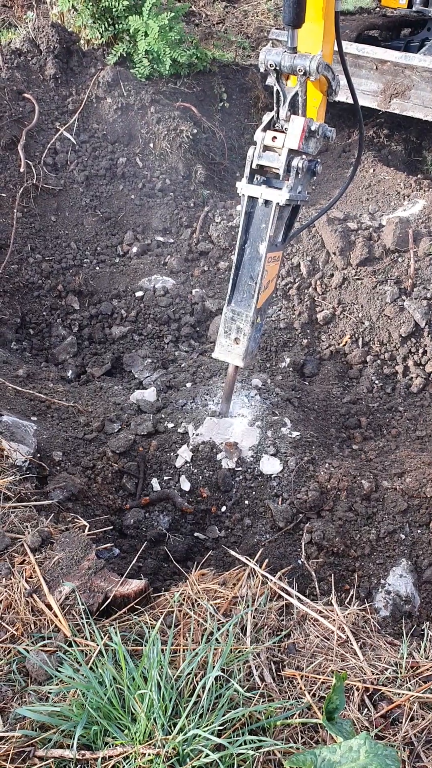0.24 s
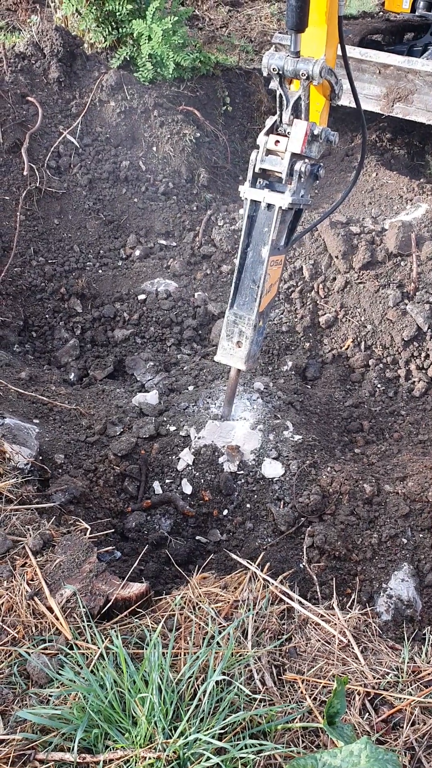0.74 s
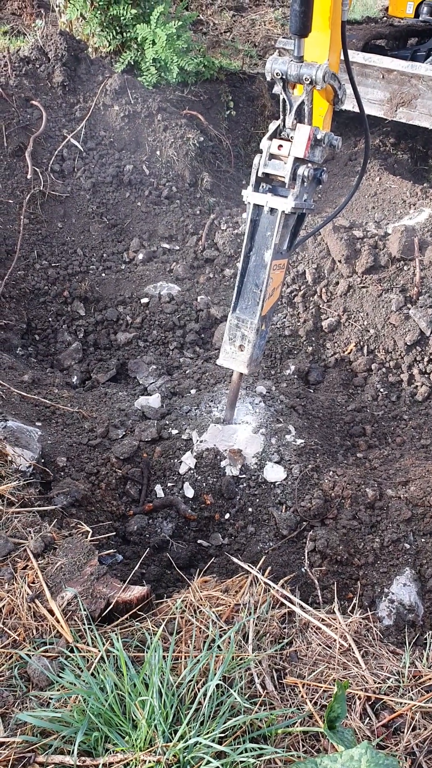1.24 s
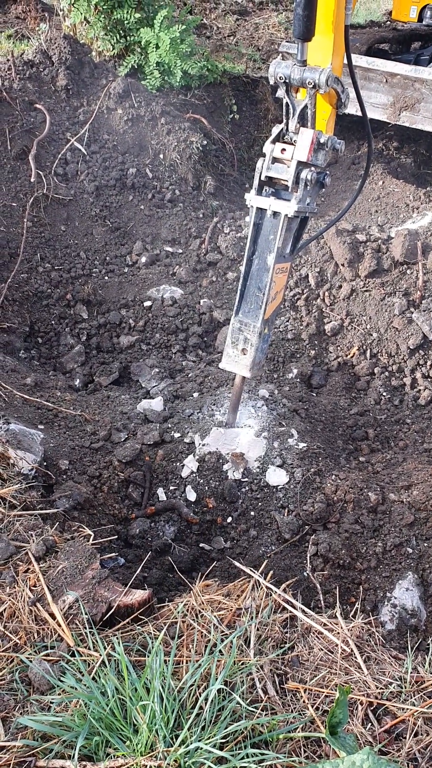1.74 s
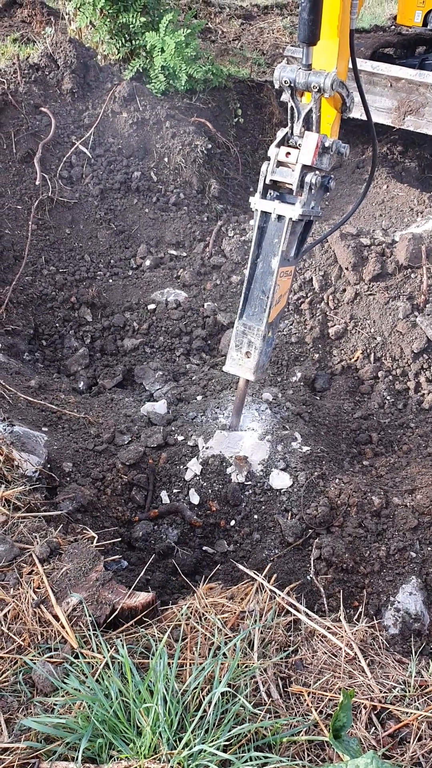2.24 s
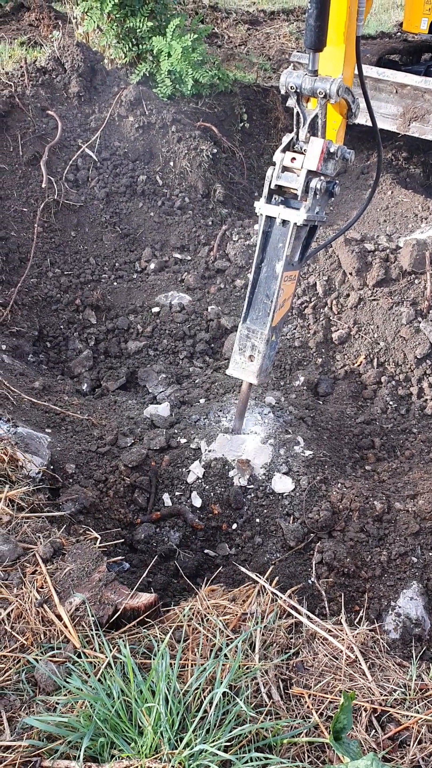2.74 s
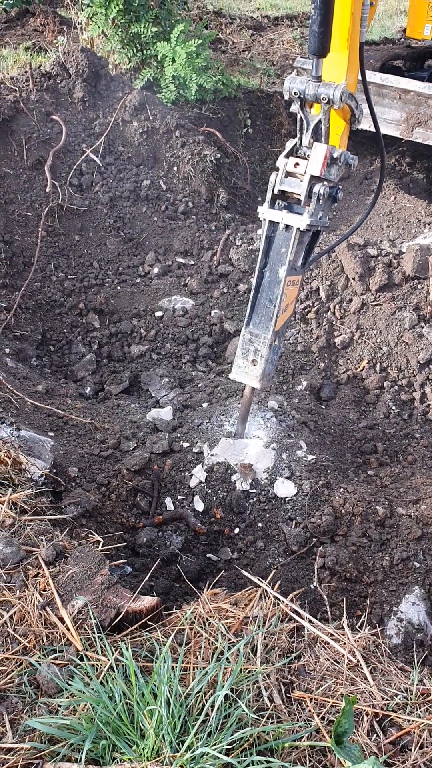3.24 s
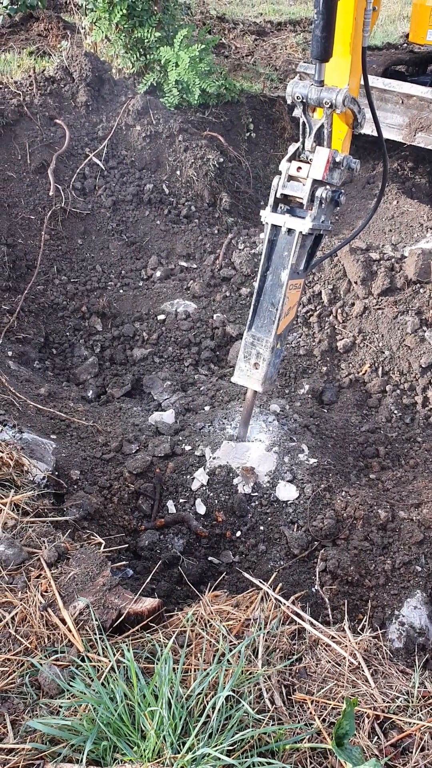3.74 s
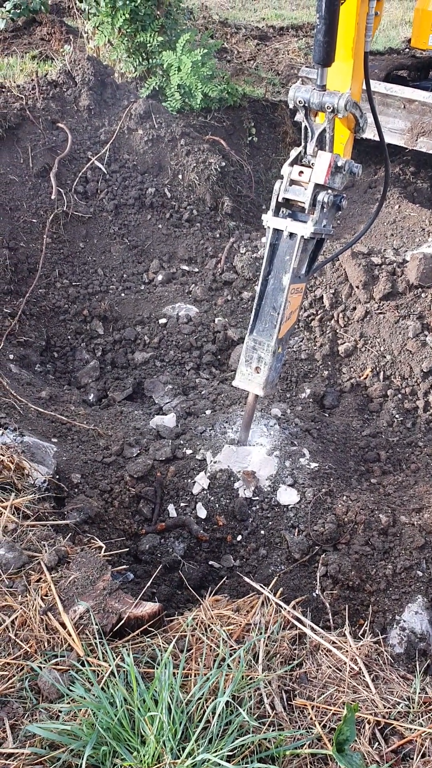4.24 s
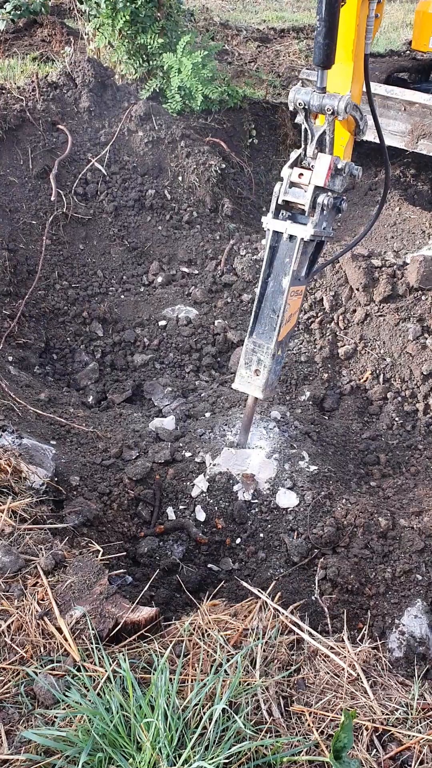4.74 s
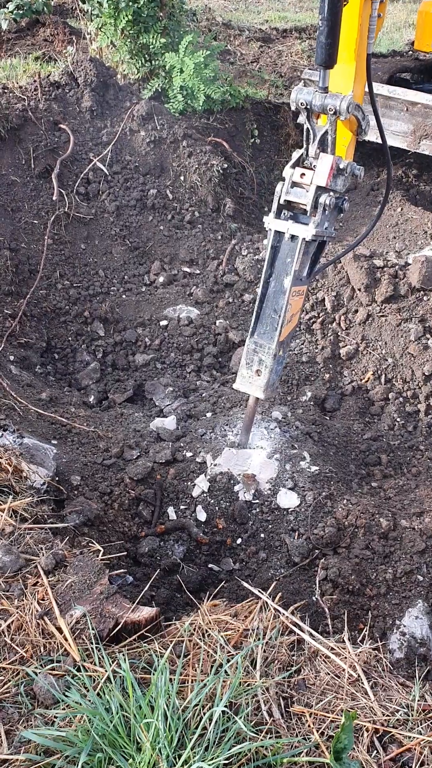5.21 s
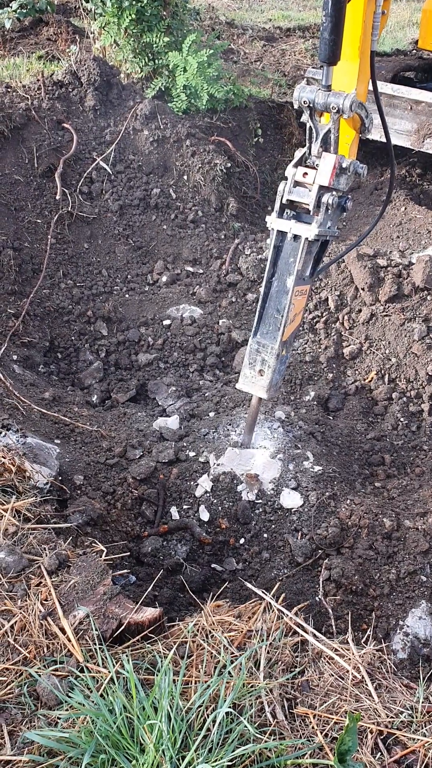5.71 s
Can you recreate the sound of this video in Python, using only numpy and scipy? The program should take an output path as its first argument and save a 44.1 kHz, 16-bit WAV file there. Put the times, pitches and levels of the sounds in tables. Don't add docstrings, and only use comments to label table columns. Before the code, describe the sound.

A hydraulic breaker hammers rock in fast metallic blows, stops while the digger's diesel idles on, then restarts with a hard clang.

```python
import sys
import numpy as np
from scipy import signal
from scipy.fft import rfft, irfft, next_fast_len
from scipy.io import wavfile
from scipy.ndimage import uniform_filter1d

SR = 44100
rng = np.random.default_rng(int(sys.argv[2]) if len(sys.argv) > 2 else 0)


def ratio_of_db(decibels):
    return 10 ** (np.asarray(decibels, float) / 20)


def int16_out(signal):
    q = np.round(np.clip(np.atleast_2d(signal).T, -1, 1) * 32767)
    wavfile.write(sys.argv[1], SR, q.astype(np.int16))


N = 263277

MOVE_S = 3
USUAL_BLOW_DB = -6
HAMMER_LEAD_S = 0.000328
# t/s, peak level/dB
FIRST_BLOWS = [(0.0483, -8.5), (0.1256, -8.5), (0.2024, -5.5), (0.2773, -6.5), (0.3556, -7.5),
               (0.4339, -5.5), (0.5097, -7), (0.5891, -6), (0.6629, -7), (0.7517, -7), (0.8235, -5),
               (0.8929, -7.5), (0.9597, -8), (1.0266, -7), (1.0944, -6.5), (1.1618, -7), (1.2306, -6),
               (1.2984, -6.5), (1.3668, -6.5), (1.4356, -7.5), (1.503, -6), (1.5703, -6.5), (1.6372, -6),
               (1.7045, -5), (1.7719, -6)]
# t/s, peak level/dB
SECOND_BLOWS = [
    (5.5413, -2),
    (5.6151, -6),
    (5.675, -6.5),
    (5.7309, -5),
    (5.7843, -5.5),
    (5.8376, -6),
    (5.8915, -5.5),
    (5.9454, -4.5),
]
# f/Hz, time to fall 60 dB/s
RATTLE_T60 = [(500, 0.57), (2000, 0.23), (6000, 0.11), (15000, 0.12)]
# f/Hz, left minus right/dB, shared part/0-1
HAMMER_PORTS = [(125, 1, 1), (285, -8, 0.31), (640, 0.5, 1), (1450, 5, 0.56), (3170, -3, 0.11),
                (6130, 3, 0.16), (8800, 7, 0.36), (15500, 6.5, 0.18)]


def breaker():
    s, peak_db, housing_db, bright_db, valve_db = strokes()
    valve_s = s - np.where(s < MOVE_S, 0.0093, 0.0085)
    s = s + 0.0007
    restart = np.arange(len(s)) == np.argmax(s > MOVE_S)
    valve_db = valve_db + 1.5 * restart
    peak_db = peak_db - 3.6 * restart
    restart_db = 5 * restart

    blows = chisel_and_housing(s, peak_db, housing_db)
    low = arm_and_ground(s, peak_db, restart_db)
    spool = valve_spool(valve_s, valve_db)
    rattle = rattle_and_jet(s, peak_db, bright_db, restart_db, valve_s, valve_db)
    direct = low + spool + rattle[0]
    other = np.roll(spool, 60) + rattle[1]
    return blows + ports(direct, other, HAMMER_PORTS, HAMMER_LEAD_S)


def strokes():
    earlier = [(early_s, -5) for early_s in (-0.13, -0.029)]
    s, peak_db = np.transpose(earlier + FIRST_BLOWS + SECOND_BLOWS)
    seat_no = (s > MOVE_S).astype(int)
    since = s - np.where(seat_no, SECOND_BLOWS[0][0], FIRST_BLOWS[0][0])
    harder = peak_db - USUAL_BLOW_DB
    luck = rng.standard_normal((len(s), 3))

    housing_db = np.take([-16.5, -15.5], seat_no) - 0.41 * harder + 0.8 * luck[:, 0]
    housing_db += -1.5 * (s == SECOND_BLOWS[0][0])
    bright_db = np.take([2.0, 1], seat_no) - 0.93 * harder + 1.0 * luck[:, 1]
    fade_db_per_s = np.take([1, 63.5], seat_no)
    valve_db = np.take([-21, -16], seat_no) - fade_db_per_s * since + 1.2 * luck[:, 2]
    return s, peak_db, housing_db, bright_db, valve_db


def chisel_and_housing(s, peak_db, housing_db):
    # f/Hz, left minus right/dB, left port leads/rad
    first_places = [(772, -3, 1.3), (860, 8, 1.8), (1095, 3, .5), (1154, -1, 1.2), (1528, 4, -.9),
                    (1959, 12, -2.1), (2029, -1, .8), (2352, 0, -.4), (2420, 0, -.4), (2592, -1, -.3),
                    (3106, 1, -1), (3211, -9, 1.6), (3356, 0, 1.8), (3507, 9, 2.2), (3816, -4, 2),
                    (4449, -9, -3.1), (5162, -1, 3)]
    # level/dB, time to fall 60 dB/s
    first_rings = [(-22.5, 0.38), (-6.5, 0.11), (-5, 0.087), (-16.5, 0.21), (-17.5, 0.072), (-36, 0.081),
                   (-15, 0.15), (-8.5, 0.14), (-24.5, 0.2), (-10.5, 0.097), (-26, 0.33), (-12, 0.044),
                   (-16.5, 0.069), (-57.5, 0.061), (-13.5, 0.012), (-10.5, 0.037), (-14.5, 0.071)]
    # f/Hz, left minus right/dB, left port leads/rad
    second_places = [(632, 1, .5), (772, -1, 1.5), (837, 2, 1.7), (1073, 4, .7), (1466, 5, .6),
                     (1765, 11, 1), (1868, 8, -.1), (2013, 2, .3), (2390, 1, -.5), (2667, -3, .8),
                     (3009, 4, .9), (3540, 7, 1.4), (3749, -3, 2), (4150, -1, 1.7), (6939, 2, -2.2)]
    # level/dB, time to fall 60 dB/s
    second_rings = [(-21.5, 0.2), (-14.5, 0.14), (-13, 0.2), (-2, 0.06), (-26, 0.056), (-21, 0.067),
                    (-14, 0.056), (-8, 0.04), (-9.5, 0.13), (-12.5, 0.084), (-3, 0.035), (-3, 0.02),
                    (-12.5, 0.085), (-24, 0.038), (-15, 0.063)]
    a, b = s < MOVE_S, s > MOVE_S
    first = seat(s[a], peak_db[a] - 5.5, housing_db[a], first_places, first_rings, crowd_db=5.5)
    second = seat(s[b], peak_db[b] - 7.0, housing_db[b], second_places, second_rings, crowd_db=5)
    return first + second


def seat(s, db, housing_db, places, rings, crowd_db):
    # f/Hz, level per Hz/dB
    dense = [(300, -28.5), (600, -13), (1300, -10.5), (2400, -7.5), (4200, -3), (4900, -15), (7700, -39.5),
             (8900, -14), (11000, -29.5), (16000, -20)]
    t = np.arange(SR // 2) / SR
    bodies = np.zeros((4, 2, t.size))
    contact = (1 - np.exp(-t / 0.00015)) * (1 + 1.1 * ratio_of_db(-60 * t / 0.02))
    for k, ((hz, pan_db, lead), (level_db, t60)) in enumerate(zip(places, rings)):
        phase = 2 * np.pi * hz * t + np.array([[lead], [-lead]]) / 2
        pan = ratio_of_db([[pan_db / 2], [-pan_db / 2]])
        mode = ratio_of_db(level_db - 60 * t / t60) * pan * np.sin(phase)
        if hz < 1400:
            bodies[0] += mode * (1 - np.exp(-t / 0.0021))
        else:
            bodies[1 + k % 3] += mode * contact

    crack = ratio_of_db(0.5 - 60 * t / 0.014) * np.sin(2 * np.pi * 2450 * t)
    bodies[1] += crack * (1 - np.exp(-t / 0.0002))

    def crowd_fade(hz):
        return ratio_of_db(-60 * t / at_hz(RATTLE_T60, hz)) + 2.6 * ratio_of_db(-60 * t / 0.011)

    crowd = bands(dense, crowd_fade, size=t.size)
    bodies[2] += ratio_of_db(crowd_db) * ports(*crowd, HAMMER_PORTS, HAMMER_LEAD_S)

    luck = 1.6 * rng.standard_normal((len(s), 4))
    levels_db = db + luck.T * [[0], [0.5], [1], [1]]
    levels_db[0] += housing_db + 17.0
    early = SR // 8
    out = np.zeros((2, N))
    for level_db, body in zip(levels_db, bodies):
        hits = clicks(s, ratio_of_db(level_db), size=early)
        out += signal.fftconvolve(hits[None], body)[:, early:early + N]
    return out


def arm_and_ground(s, peak_db, restart_db):
    # f/Hz, level/dB, time to fall 60 dB/s
    arm_modes = [(863, -27, .4), (975, -40, .7), (1357, -37, 1.2), (1464, -39, .5), (1938, -38, 1.7),
                 (2365, -23, .3), (2590, -31, .3), (3090, -34, .45), (4200, -38, .3), (4650, -34, .35)]
    # f/Hz, level/dB, time to fall 60 dB/s
    ground_modes = [(81, -33.5, 0.2), (183, -31.5, 0.11), (213, -21.5, 0.073), (254.6, -23, 0.13)]
    arm = struck(s, peak_db + restart_db, arm_modes, spread_db=2.0)
    thump_db = peak_db + 0.93 * (peak_db - USUAL_BLOW_DB)
    return arm + struck(s + 0.00884, thump_db, ground_modes, spread_db=3.0)


def valve_spool(valve_s, valve_db):
    # f/Hz, level/dB, time to fall 60 dB/s
    first_valve = [(4120, 2.5, 0.048), (4306, -2, 0.023), (7103, -8.5, 0.14), (3280, -15.5, 0.0067)]
    # f/Hz, level/dB, time to fall 60 dB/s
    second_valve = [(5020, -6, .07), (4250, -7, .02), (7300, -14, .08), (3100, -9, .015)]
    a = valve_s < MOVE_S
    spool = struck(valve_s[a], valve_db[a] - 7.0, first_valve, spread_db=2.0)
    spool += struck(valve_s[~a], valve_db[~a] - 7.0, second_valve, spread_db=2.0)
    spool += 1.2 * np.roll(spool, 97) + 1.8 * np.roll(spool, 190)
    return spool


def rattle_and_jet(s, peak_db, bright_db, restart_db, valve_s, valve_db):
    # f/Hz, level per Hz/dB
    rattle_spectrum = [(300, -41), (700, -20), (2000, -15.5), (4200, -18), (6000, -18), (7500, -24.5),
                       (9000, -26), (16000, -33)]
    grit = ratio_of_db(2.5 * drift(120))

    def dying(hz):
        bright = np.clip(np.log2(hz / 3000), 0, 1)
        t60 = at_hz(RATTLE_T60, hz)
        hit_db = peak_db + restart_db * (2 - bright) + bright * bright_db
        hit = clicks(s, ratio_of_db(hit_db + spent(s, t60)))
        tail = fade(hit, t60)
        jet_t60 = 0.065
        jet_db = valve_db + 9.0 + 7.5 * bright
        jet = fade(clicks(valve_s, ratio_of_db(jet_db + spent(valve_s, jet_t60))), jet_t60)
        far = 0.13 * ratio_of_db(-9.0 * bright) * fade(hit, 0.7)
        return (tail + jet) * grit + far

    return ratio_of_db(1.0) * bands(rattle_spectrum, dying)


def squeaks():
    # t/s, length/s, f/Hz, width/Hz,
    # level/dB
    narrow_noises = [(2.116, 0.18, 7900, 200, -72.5), (2.24, 0.18, 9200, 200, -77.5),
                     (2.334, 0.16, 7240, 500, -69), (2.4, 0.062, 850, 500, -49.5), (2.41, .02, 2400, 600, -60),
                     (4.29, .07, 6300, 1500, -59), (5.34, 0.095, 1743, 40, -47.5),
                     (5.35, 0.039, 3960, 80.3, -53), (5.472, 0.1, 8770, 150, -59), (2.702, 4.3, 1074, 50, -56.5),
                     (2.8, 2.5, 1695, 60.3, -59), (1.81, 0.29, 1010, 150, -53)]
    out, t = np.zeros((2, N)), np.arange(N) / SR
    white = rng.standard_normal(N)
    for s, length, hz, width_hz, db in narrow_noises:
        t60 = 3.0 / width_hz
        narrow = ring(ring(white, hz, t60), hz, t60)
        swell = np.sin(np.pi * np.clip((t - s) / length, 0, 1))
        out += ratio_of_db(db) * rms_one(narrow) * swell * [[1.3], [0.7]]
    return out


def engine():
    # t/s, firing rate/Hz
    speed_points = [(0, 52), (.62, 50.8), (.9, 45), (1.2, 45), (1.7, 48), (2.15, 56.2), (2.35, 55.5),
                    (2.65, 52.2), (3.6, 50.3), (5.5, 50.05), (5.68, 47.4), (5.97, 47)]
    # t/s, load/0-1
    load_points = [
        (0, 0.46),
        (.7, 0.23),
        (.85, 0.97),
        (1.4, 0.75),
        (1.8, 0.86),
        (2.25, 0.01),
        (5.5, 0),
        (5.58, .55),
        (5.8, 0.96),
    ]
    # multiple of the three-firing cycle, level/dB
    exhaust = [(1, -54.5), (2, -33.5), (3, 0), (4, -26), (5, -31.5), (6, -30.5), (7, -40.5), (8, -34.5),
               (9, -23.5), (10, -22), (11, -24.5), (12, -19), (13, -21.5), (14, -29.5), (15, -21.5),
               (16, -32), (17, -28.5), (18, -21), (19, -39.5), (20, -41), (21, -29.5), (22, -47.5),
               (23, -26.5), (24, -22), (25, -36.5),
               (32, -23), (34, -29.5), (35, -24.5), (39, -25.5), (66, -30.5), (102, -37.5)]
    # f/Hz, level per Hz/dB
    clatter = [(30, 1), (90, -5), (200, -14.5), (380, -9), (470, -29), (600, -9), (770, -14), (900, -18),
               (2140, -24.5), (3980, -30), (5100, -48), (6000, -38.5), (7000, -33.5), (9000, -37)]
    # f/Hz, left minus right/dB, shared part/0-1
    engine_ports = [(128, 6, 0.48), (297, -5.5, 1), (644, -1, 0.3), (1430, 1.5, 0.59), (3300, -3, 0.07),
                    (7000, 8.5, 0.19), (15000, 14, 0.33)]
    t = np.arange(N) / SR
    speed = np.interp(t, *np.transpose(speed_points))
    speed = uniform_filter1d(speed, SR // 8, mode="nearest")
    load = np.interp(t, *np.transpose(load_points))
    cycle = 2 * np.pi * np.cumsum(speed) / SR / 3

    level_db = -44.5 + 4 * load + gain_lift(t)
    boom_db = level_db + 15.5 - 17.5 * load
    second_db = level_db - 8 - 2 * (speed - 50)
    bark_db = 16 * np.sin(np.pi * np.clip((t - FIRST_BLOWS[-1][0] - 0.03) / 0.32, 0, 1))
    second_db = second_db + bark_db
    boom = ratio_of_db(boom_db + 0.28 * drift(4.4)) * np.sin(3 * cycle)
    boom += ratio_of_db(second_db + 2.1 * drift(12)) * np.sin(6 * cycle + 1)

    tones = np.zeros(N)
    for k, db in exhaust:
        if k in (3, 6):
            continue
        waver_db = (0.6 if k % 3 == 0 else 2.2) * drift(2.5)
        tone_db = db + 18.0 + 0.62 * bark_db * (k == 9) + waver_db
        tones += ratio_of_db(tone_db) * np.sin(k * cycle + rng.uniform(0, 6.33) + 0.18 * drift(2.4))
    tones += ratio_of_db(-20.0 + 2.83 * (speed - 48.5) + 1.5 * drift(6.6)) * np.sin(36 * cycle)
    tones = signal.lfilter(*signal.iirnotch(475, 3.5, fs=SR), tones)

    throb = 1 + 0.086 * np.cos(3 * cycle) + 0.041 * np.cos(cycle)
    noise = bands(clatter, lambda hz: ratio_of_db(0.76 * drift(4.2)) * (throb if hz > 500 else 1))
    noise = signal.sosfilt(signal.cheby2(6, 30, 7700, fs=SR, output="sos"), noise)
    hiss = ratio_of_db(-54.0) * signal.lfilter([1, 0.25], [1], rng.standard_normal((2, N)))
    near, far = ratio_of_db(level_db + 23.5) * (noise + hiss)
    direct = np.sqrt(2) * boom + ratio_of_db(level_db) * tones + near
    return duck() * ports(direct, far, engine_ports, lead_s=0.00045)


def gain_lift(t):
    start, end = FIRST_BLOWS[-1][0] + 1.05, SECOND_BLOWS[0][0]
    rise = np.sin(np.pi / 2 * np.clip((t - start) / 0.65, 0, 1))
    return 10 * rise * np.clip(1 - (t - end) / 0.1, 0, 1)


def duck():
    s = np.transpose(FIRST_BLOWS + SECOND_BLOWS)[0] - 0.0045
    dip = fade(clicks(s, 0.9), 0.14)
    return ratio_of_db(-9.5 * uniform_filter1d(dip, SR // 150))


def ports(direct, other, table, lead_s):
    size = next_fast_len(direct.size + 512)
    hz = np.arange(size // 2 + 1) * SR / size
    apart = hz ** 4 / (hz ** 4 + 215 ** 4)
    tilt = ratio_of_db(apart * at_hz(table, hz + 1) / 2)
    shared = 1 - apart * (1 - np.clip(at_hz(table, hz + 1, order=2), 0, 1))
    lag = 2 * np.pi * hz * lead_s * apart
    near, far = rfft(direct, size), rfft(other, size)
    right = shared * near * np.exp(-1j * lag) + np.sqrt(1 - shared ** 2) * far
    return irfft(np.array([near * tilt, right / tilt]), size)[:, :direct.size]


def bands(spectrum, shape, size=N):
    out, edges = 0, 32 * 2 ** np.arange(0, 9.2, 1 / 3)
    white = rng.standard_normal((2, 2, size))
    for k, (low, high) in enumerate(zip(edges, edges[1:])):
        hz = np.sqrt(low * high)
        if hz > spectrum[0][0]:
            sos = signal.butter(2, [low, high], "band", fs=SR, output="sos")
            band = signal.sosfilt(sos, white[k % 2])
            out = out + ratio_of_db(at_hz(spectrum, hz)) * shape(hz) * band
    return out


def struck(s, db, modes, spread_db):
    luck = rng.standard_normal((len(s), len(modes)))
    out = np.zeros(N)
    for k, (hz, level_db, t60) in enumerate(modes):
        strike_db = db + level_db + spread_db * luck[:, k] + spent(s, t60)
        out += ring(clicks(s, ratio_of_db(strike_db)), hz, t60)
    return out


def ring(x, hz, t60):
    r, w = ratio_of_db(-60 / (t60 * SR)), 2 * np.pi * hz / SR
    return signal.lfilter([0, np.sin(w)], [1, -2 * r * np.cos(w), r * r], x)


def fade(x, t60):
    return signal.lfilter([1], [1, -ratio_of_db(-60 / (t60 * SR))], x)


def clicks(s, gains, size=0):
    out = np.full(N + size, 1e-18)
    places = np.clip(np.round(s * SR).astype(int) + size, 0, N + size - 1)
    np.add.at(out, places, gains)
    return out


def spent(s, t60):
    return 60 * np.minimum(s, 0) / t60


def drift(rate):
    r = np.exp(-80 * np.pi * rate / SR)
    slow = signal.lfilter([1], [1, -2 * r, r * r], rng.standard_normal(N // 40 + 2002))[2000:]
    return np.interp(np.arange(N) / 40, np.arange(len(slow)), rms_one(slow))


def rms_one(x):
    return x / np.sqrt(np.mean(x ** 2) + 1e-20)


def at_hz(points, hz, order=1):
    points = np.array(points)
    return np.interp(np.log(hz), np.log(points[:, 0]), points[:, order])


def scene():
    return breaker() + squeaks() + engine()


def roll_off(x):
    return signal.sosfilt(signal.butter(12, 16500, fs=SR, output="sos"), x)


def record(dry):
    cut = signal.sosfilt(signal.cheby2(8, 45, 16600, fs=SR, output="sos"), dry)
    return roll_off(np.clip(cut, -1, 1))


dry = scene()
out = record(dry)
int16_out(out)
```